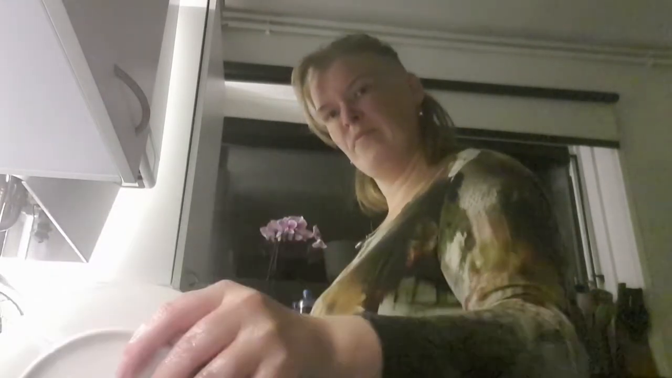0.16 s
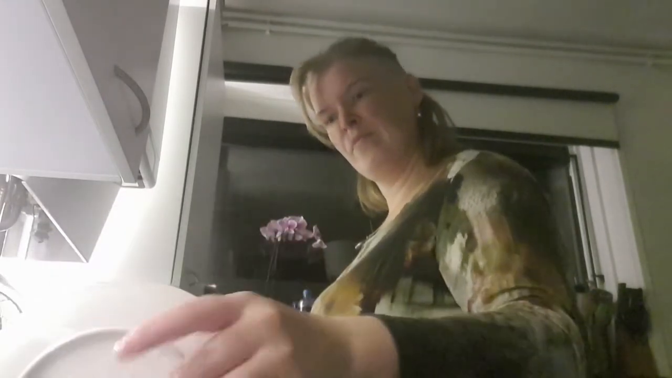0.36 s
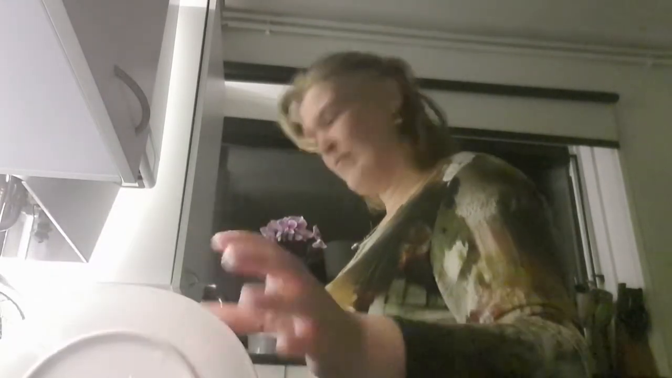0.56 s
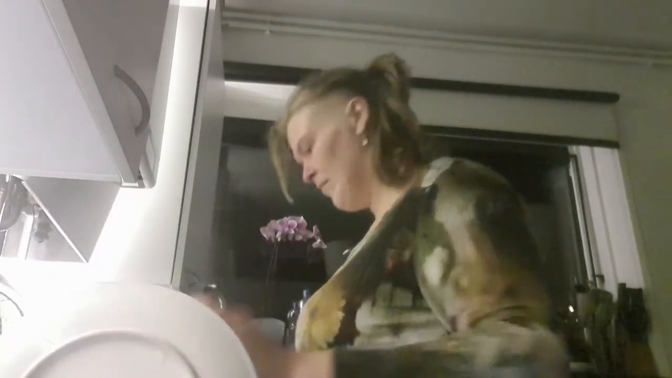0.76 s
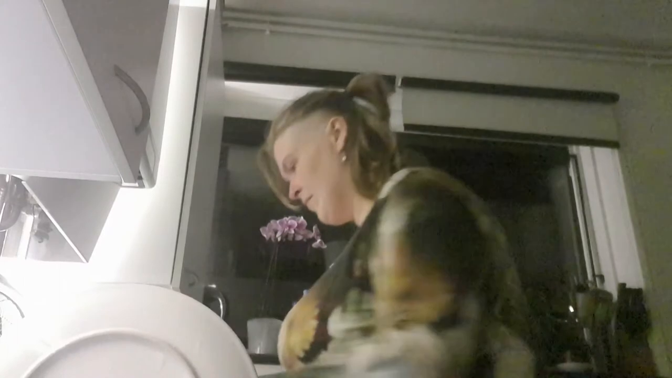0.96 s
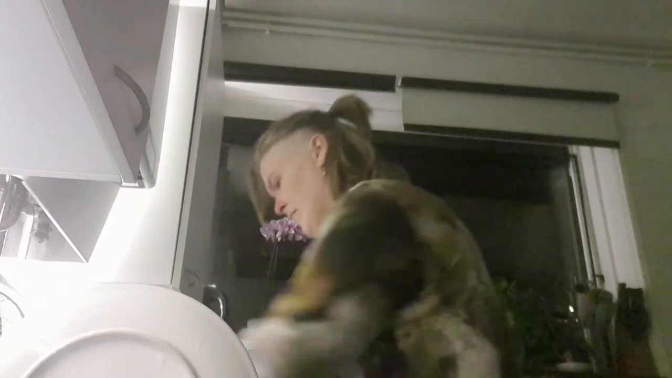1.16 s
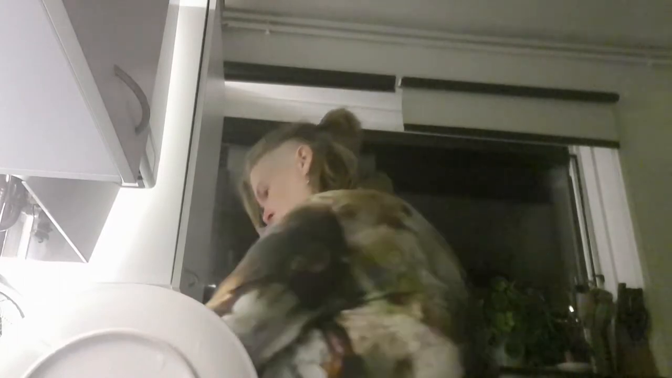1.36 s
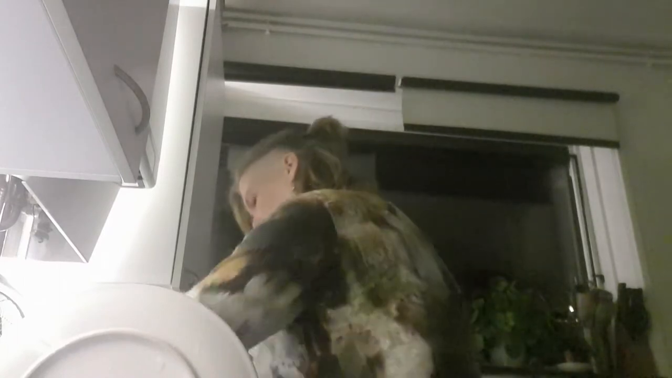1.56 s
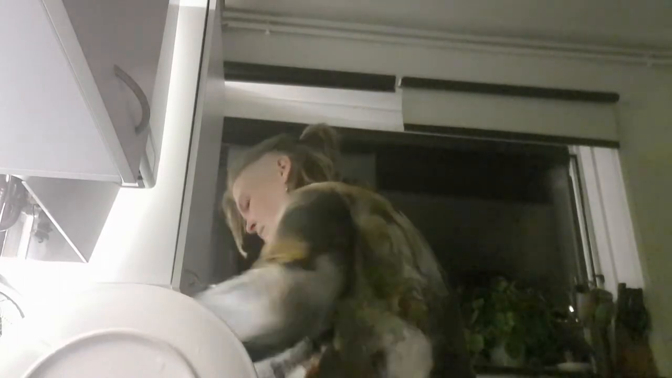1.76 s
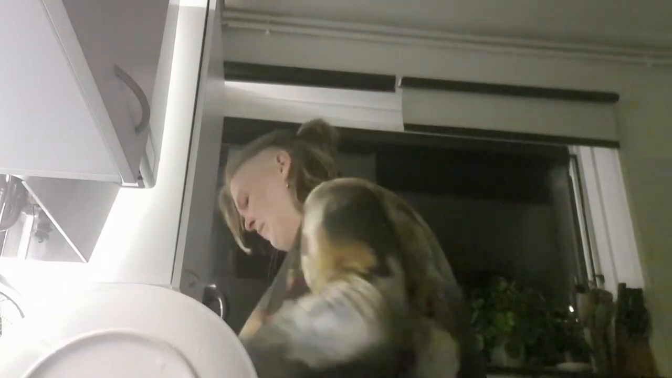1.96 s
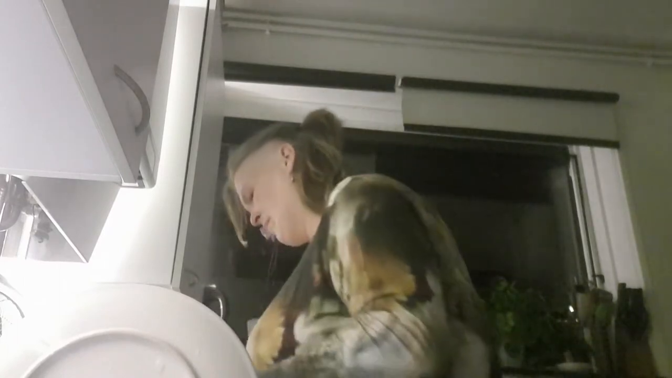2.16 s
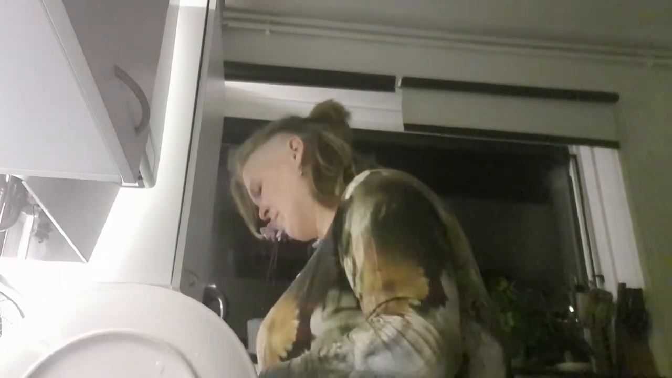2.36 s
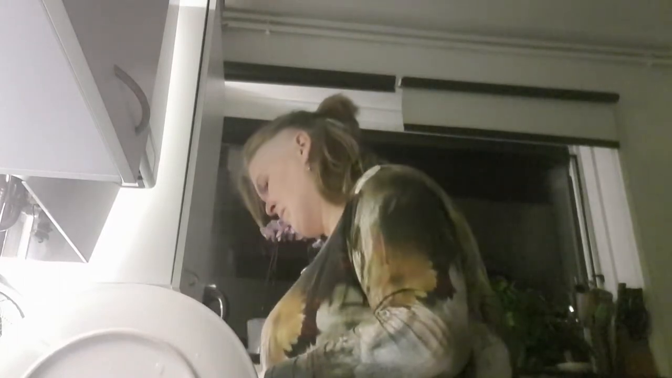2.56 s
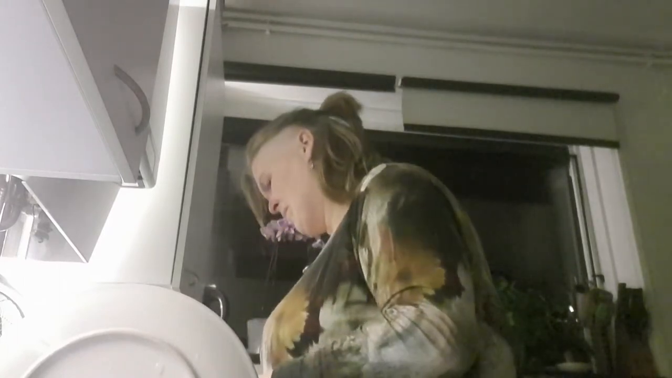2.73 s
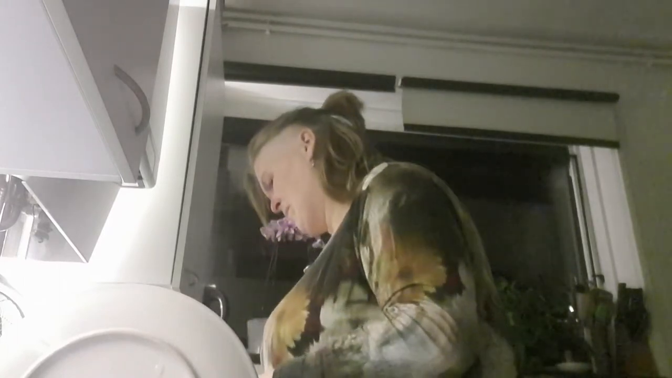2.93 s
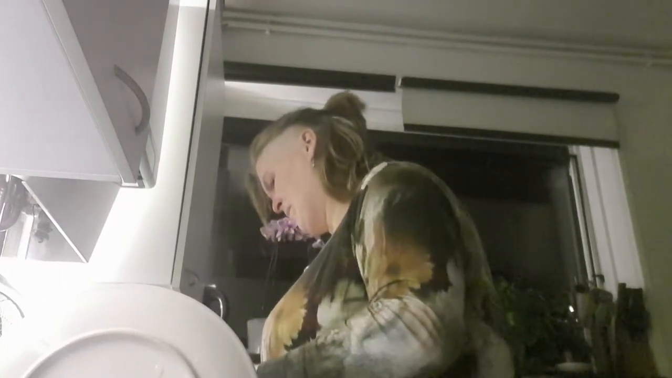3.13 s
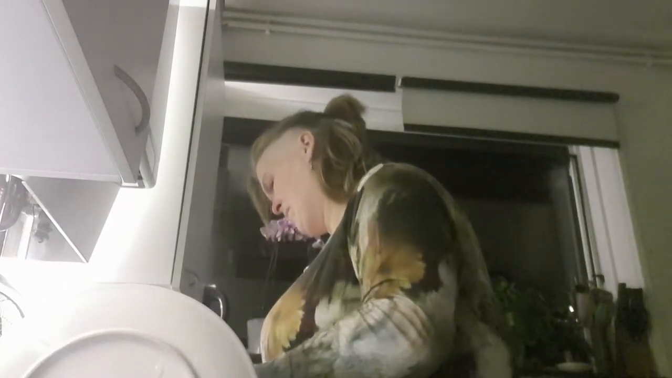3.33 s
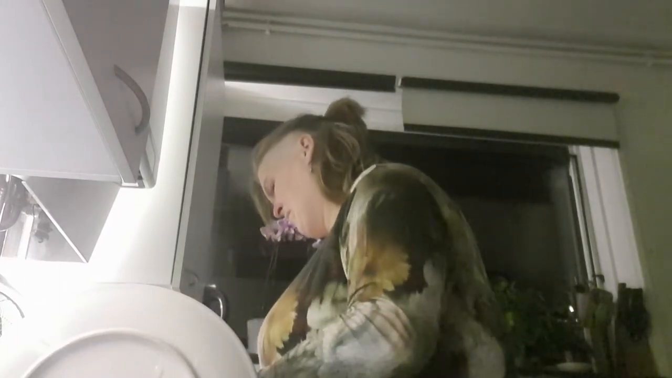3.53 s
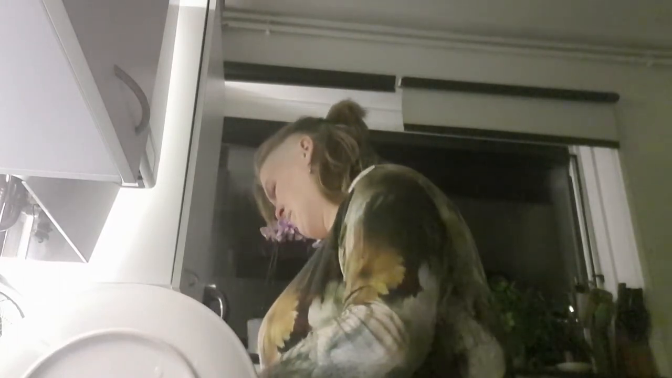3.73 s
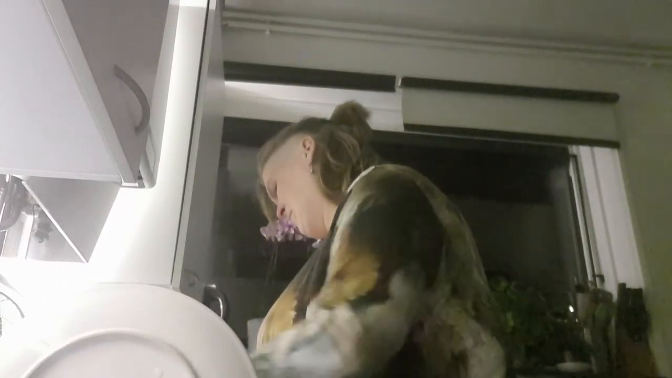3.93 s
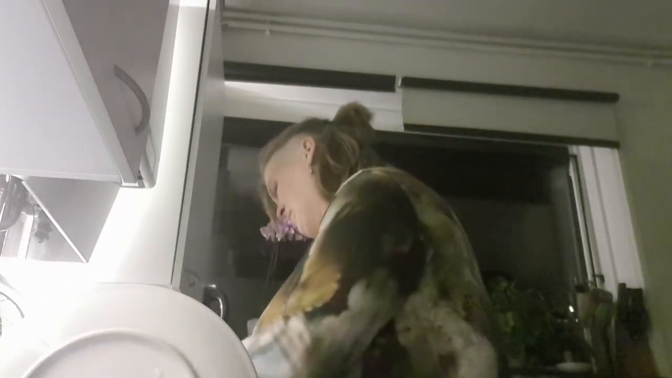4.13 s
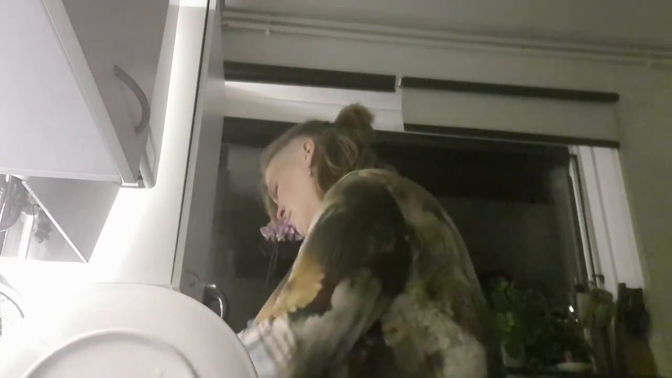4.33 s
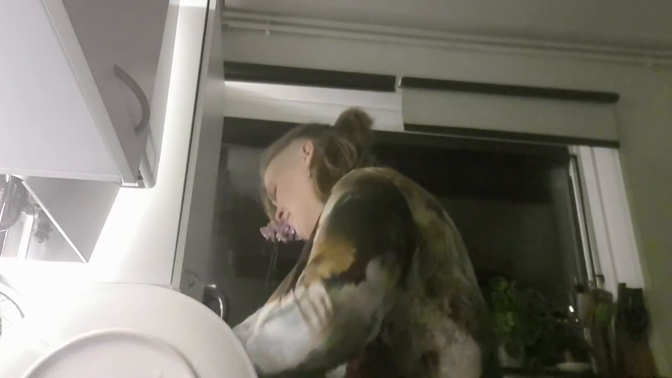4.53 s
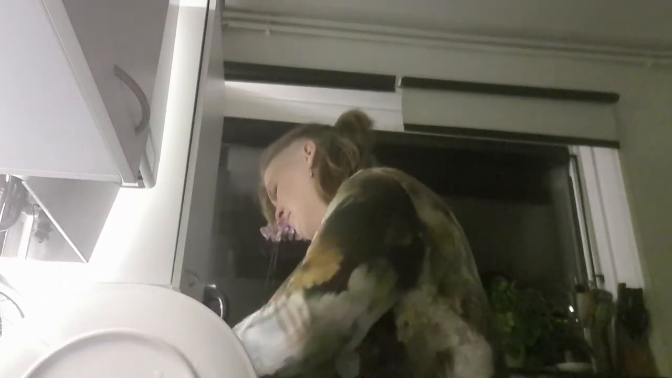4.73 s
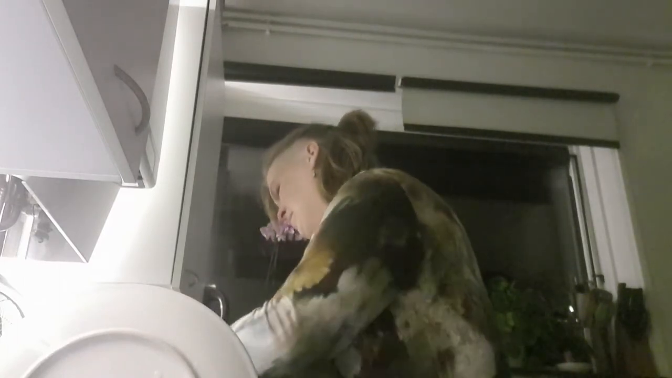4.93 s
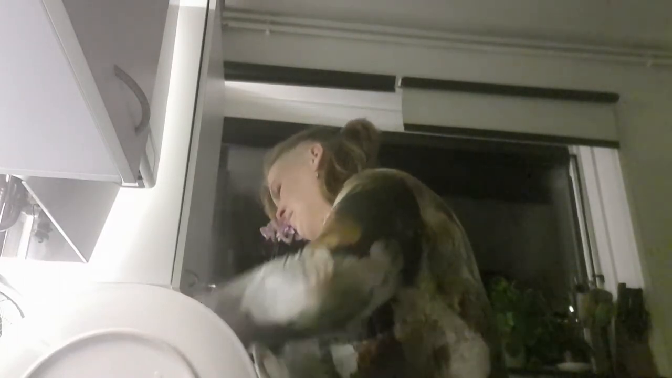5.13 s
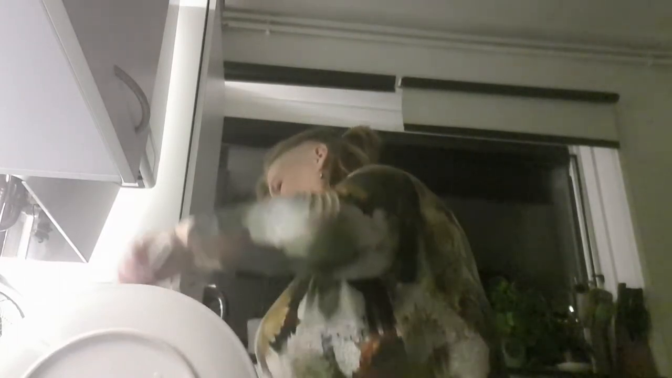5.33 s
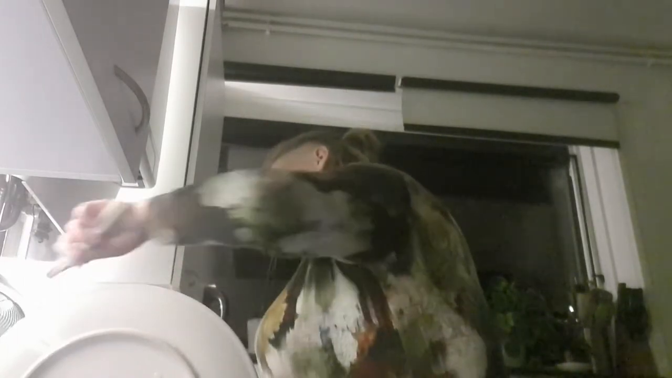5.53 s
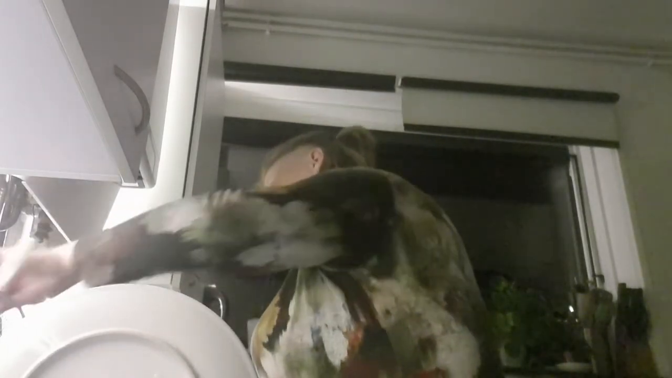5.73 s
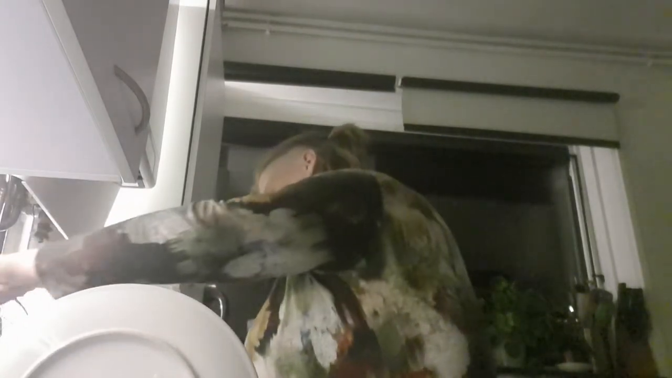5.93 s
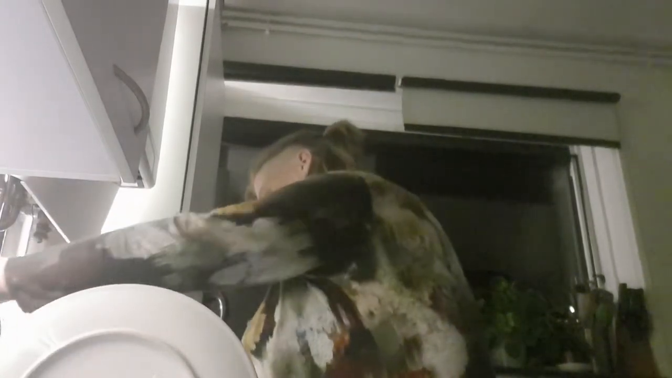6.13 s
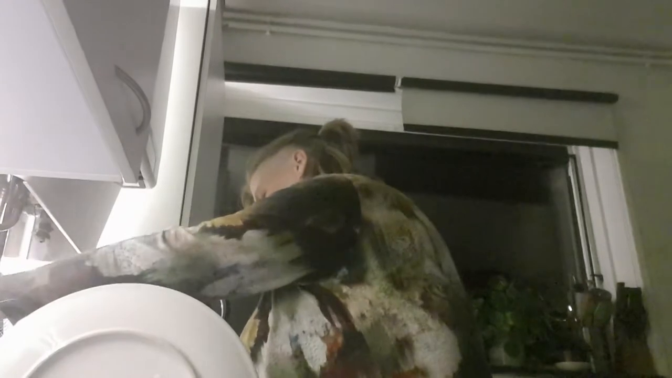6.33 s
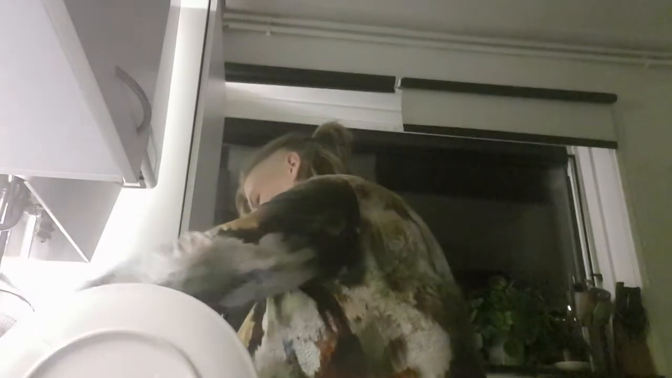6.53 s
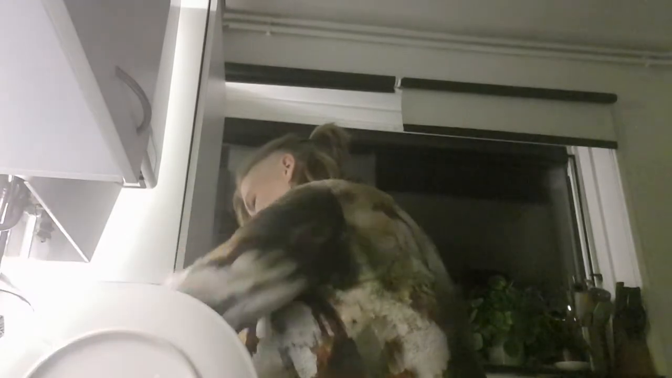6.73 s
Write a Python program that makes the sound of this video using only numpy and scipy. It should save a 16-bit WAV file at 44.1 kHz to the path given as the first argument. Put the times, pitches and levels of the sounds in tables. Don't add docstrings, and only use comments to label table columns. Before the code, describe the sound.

A wet plate clacks into a drying rack close by, then china and cutlery knock and slosh in a steel sink before quiet returns.

```python
import sys
import numpy as np
from scipy import signal
from scipy.fft import rfft, irfft
from scipy.io import wavfile

SR = 44100
rng = np.random.default_rng(int(sys.argv[2]) if len(sys.argv) > 2 else 0)


def log_audio(samples):
    frames = np.atleast_2d(samples).T
    limited = np.clip(frames, -1, 1)
    pcm = np.round(limited * 32767).astype(np.int16)
    wavfile.write(sys.argv[1], SR, pcm)


def magnitude_from_level(level_db):
    exponent = np.asarray(level_db, float) / 20
    return 10 ** exponent


N = 303849
LAG = 10

# (f/Hz, level/dB, t60/s)
BASIN_FLOOR = [(279, -11.5, 0.15), (300.3, 2, 0.065), (337, 0.5, 0.056), (380, -0.5, 0.11),
               (408, 7.5, 0.038), (439, 4, 0.025), (534.5, -1.5, 0.18)]
# (f/Hz, level/dB, t60/s)
BASIN_WALLS = [(608, 0, 0.085), (678, 3.5, 0.064), (735, -3.5, 0.077), (812, -21, 0.18), (895, -10.5, 0.08),
               (922, -4, 0.06), (1080, -23, 0.034), (1290, 3.5, 0.0084)]


def evened(x):
    return x / np.sqrt(np.mean(x ** 2) + 1e-20)


def read(points, hz):
    f, value = np.transpose(points)
    return np.interp(np.log(hz + 1), np.log(f + 1), value)


def curve(rows, order):
    rows = np.array(rows)
    return np.interp(np.arange(N) / SR, rows[:, 0], rows[:, order])


def add(mix, s, peak_db, sound):
    part = mix[round(s * SR):][:len(sound)]
    scaled = magnitude_from_level(peak_db) * sound / abs(sound).max()
    part += scaled[:len(part)]


def colour(x, points):
    size = x.shape[-1]
    gain = magnitude_from_level(read(points, np.fft.rfftfreq(size, 1 / SR)))
    return irfft(rfft(x) * gain, size)


def band(x, low_hz, high_hz):
    return signal.sosfilt(signal.butter(2, [low_hz, high_hz], "band", fs=SR, output="sos"), x)


def burst(t60, size=4096):
    return rng.standard_normal(size) * magnitude_from_level(-60 * np.arange(size) / SR / max(t60, 0.002))


def ring(modes, spread=0., uneven_db=0., size=12000):
    hz, db, t60 = np.transpose(modes)[:, :, None]
    detune, luck = rng.standard_normal((2, len(modes), 1))
    t = np.arange(size) / SR
    decay = magnitude_from_level(db + uneven_db * luck - 60 * t / t60)
    return (decay * np.sin(2 * np.pi * hz * (1 + spread * detune) * t)).sum(0)


def pair(a, b, c):
    # (f/Hz, share of power in common)
    likeness = [(100, 0.71), (400, 1), (900, 0.19), (2000, 0.12), (8000, 0.0057)]
    size = a.shape[-1]
    same = np.clip(read(likeness, np.fft.rfftfreq(size, 1 / SR)), 0, 1)
    shared = rfft(np.array([np.roll(a, LAG), a]))
    own = rfft(np.array([b, c]))
    return irfft(np.sqrt(same) * shared + np.sqrt(1 - same) * own, size)


def air():
    # (f/Hz, level/dB)
    tone = [(20, -21), (66, -2.5), (135, -12.5), (687, -7), (900, -16), (2530, -14), (12900, -11.5),
            (16500, -14.5)]
    # (f/Hz, level/dB)
    hollow = [(1900, 2.5), (2450, -7.5), (3000, 0.5), (5500, -7), (7000, -4)]
    noise = pair(*rng.standard_normal((3, N)))
    return magnitude_from_level(-53) * colour(evened(colour(noise, tone)), hollow)


def kitchen(x):
    # (f/Hz, t60/s)
    reverb = [(100, 0.16), (400, 0.28), (1500, 0.29), (5000, 0.34), (12000, 0.21)]
    turn = np.arange(N) / SR * 3.1
    out, size = np.zeros((2, N)), 21000
    for k in range(5):
        taps = np.zeros((3, size))
        at = np.arange(32, size - 8, 8) + rng.integers(0, 8, (3, (size - 33) // 8))
        np.put_along_axis(taps, at, rng.choice([-1., 1.], at.shape), 1)
        taps *= 1 + 0.4 * np.exp(-np.arange(size) / SR / 0.006)
        hz, t, z = signal.stft(pair(*taps), SR, nperseg=128)
        decay = magnitude_from_level(-60 * t / read(reverb, hz)[:, None])
        tail = signal.istft(z * decay, SR, nperseg=128)[1]
        tail /= np.linalg.norm(tail[0])
        window = np.sqrt(2 / 5) * np.cos(np.pi * (turn * (1 + k % 2) + k / 5))
        out += signal.oaconvolve((x * window)[None], tail, axes=1)[:, :N]
    return out


def shake():
    # (f/Hz, level/dB, t60/s)
    counter = [(55, 0, 0.3), (123.2, -5.5, 0.3), (119, -8.5, 0.048), (209, -9.5, 0.061)]
    # (t/s, lowest mode level/dB, upper modes level/dB, length/s)
    shoves = [(0.07, -28, -32, 0.1), (0.188, -29.5, -55, 0.08), (0.484, -41, -67, 0.15),
              (1.097, -48.5, -77, 0.23), (1.373, -57, -47, 0.17), (1.762, -44.5, -49.5, 0.046),
              (2.493, -40, -40.5, 0.039), (2.683, -46, -44, 0.16), (2.93, -51, -46.5, 0.34),
              (3.9, -48, -38, 0.041), (4.075, -49, -68, 0.17), (4.253, -51, -39.5, 0.097),
              (5.767, -60, -29, 0.063)]
    tremble_db = (-56.5, -57.5)
    rest_s, rest_db = 5.98, -5.5
    rise_share, drop_db = 0.69, 11
    modes = [evened(signal.oaconvolve(rng.standard_normal(N), ring(m, size=SR))[:N])
             for m in (counter[:1], counter[1:])]
    t = np.arange(N) / SR
    power = magnitude_from_level(np.add.outer(tremble_db, rest_db * np.clip((t - rest_s) / 0.092, 0, 1))) ** 2
    for s, low_db, upper_db, length in shoves:
        away = np.maximum(t - s, (s - t) / rise_share) / length
        power += magnitude_from_level(np.subtract.outer([low_db, upper_db], drop_db * away)) ** 2
    return (np.sqrt(power) * modes).sum(0)


def drips():
    # (t/s, peak level/dB, bubble f/Hz, spray t60/s)
    drops = [(0.2904, -55.5, 5800, 0.089), (0.5158, -47.5, 8200, 0.049), (0.651, -49.5, 6100, 0.029),
             (0.749, -51, 12900, 0.043), (0.851, -50, 12500, 0.041), (0.895, -46.5, 12200, 0.026),
             (1.2307, -50, 11300, 0.05), (3.2504, -55, 1960, 0.083), (3.549, -41.5, 7300, .015),
             (4.7039, -43, 3430, 0.014), (4.859, -48.5, 11500, 0.065), (5.3544, -52, 15300, 0.05),
             (5.5294, -55, 4670, 0.046), (5.575, -50, 2960, 0.03)]
    out, t = np.zeros(N), np.arange(3000) / SR
    for s, db, hz, t60 in drops:
        bubble = np.sin(2 * np.pi * hz * t * (1 + 6 * t))
        bubble *= magnitude_from_level(-60 * t * hz / 15)
        add(out, s, db + 9.5, signal.fftconvolve(bubble, burst(t60, size=3000)))
    return out


def water():
    # (t/s, splashing level/dB, pressure on the basin level/dB)
    settle = [
        (0.0, -41.5, -70),
        (0.06, -45, -44),
        (0.17, -52, -43),
        (0.27, -71, -60.5),
    ]
    # (t/s, splashing level/dB, pressure on the basin level/dB)
    hands = [(1.15, -100, -59.5), (1.38, -45, -54), (1.54, -38.5, -44), (1.61, -48.5, -50),
             (1.94, -59, -56), (2.49, -50.5, -54), (2.7, -54, -46), (3.1, -51, -58), (3.5, -56, -62),
             (3.86, -47.5, -48), (4.07, -63.5, -56), (4.24, -56.5, -55), (4.35, -60.5, -53),
             (4.78, -54.5, -53.5), (4.93, -64.5, -58), (5.4, -54.5, -60), (5.85, -59, -59.5),
             (6.03, -61.5, -71)]
    # (t/s, level/dB)
    drag_levels = [
        (1.3, -90),
        (1.36, -53),
        (1.4, -39),
        (1.52, -41.5),
        (1.6, -58),
        (1.63, -76),
        (1.7, -95),
    ]
    # (f/Hz, level/dB)
    fizz_colour = [(1470, -25), (2500, -0.5), (3540, -0.5), (6500, 0), (14900, -3), (16100, -26),
                   (16500, -43.5)]
    # (f/Hz, level/dB)
    slosh_colour = [(470, -15), (800, 8), (987, -8), (1410, 11.5), (1750, 13), (4500, 0.5), (5850, -92),
                    (9900, -120)]
    size_db = np.minimum(rng.exponential(1, (3, N // 64 + 1)), 3.5).repeat(64, 1)[:, :N]
    drops = rng.standard_normal((3, N)) * magnitude_from_level(2.2 * size_db)
    splash_db, press_db = curve(settle + hands, order=1), curve(settle + hands, order=2)
    fizz = magnitude_from_level(splash_db) * evened(colour(drops[0], fizz_colour))
    slosh_db = -56 + 1.34 * (splash_db + 50)
    slosh = magnitude_from_level(slosh_db) * evened(colour(drops[1], slosh_colour))
    hum = magnitude_from_level(press_db) * evened(signal.oaconvolve(drops[2], ring(BASIN_FLOOR + BASIN_WALLS))[:N])
    scrape = evened(signal.oaconvolve(drops[1], ring(BASIN_WALLS[1:5]))[:N])
    return magnitude_from_level(-1.5) * (fizz + slosh + hum) + magnitude_from_level(curve(drag_levels, order=1)) * scrape


def dishes():
    # (t/s, peak level/dB)
    plate_hits = [
        (.001, -29),
        (.0445, -27),
        (.068, -16.5),
        (.096, -27),
        (.136, -27),
    ]
    bowl_hits = [
        (1.626, -28),
        (1.883, -24.5),
        (3.380, -20),
        (3.735, -40),
    ]
    crash_hits = [
        (5.740, -18),
        (5.760, -11),
    ]
    rack_hits = [
        (5.687, -21.5),
    ]
    cup_hits = [
        (6.3445, -28.5),
    ]
    plop_hits = [
        (5.226, -33),
    ]
    frame_hits = [
        (.003, -33),
        (.046, -23.5),
        (.074, -34),
        (.097, -32),
        (.135, -32),
        (3.062, -37),
        (5.74, -39),
        (5.761, -33),
    ]
    # (f/Hz, level/dB, t60/s)
    plate = [(2120, 0, .09), (3080, -8, .08), (3380, -1, .07), (3520, -3, .06), (4290, -4, .09),
             (5400, -5, .07)]
    bowl = [(738, -4, .22), (921, -4, .1), (1240, -3, .09), (1365, -4, .28), (1490, -10, .1),
            (1775, 1, .21), (2150, -7, .17), (2640, -5, .12), (2770, -10, .12), (3650, -5, .11),
            (3830, -12, .1), (4280, -9, .13), (4720, -11, .1), (5600, -12, .08)]
    crash = [(860, 6, 0.094), (1470, -1, .06), (2510, -2, 0.07), (3100, -3, 0.044), (4420, -2, .025),
             (5450, 7.5, 0.018), (7500, -16, .025)]
    rack = [(1430, -4, .1), (2800, -7, .05), (3650, 0, .09), (4400, -2, .06), (4650, -4, .05),
            (5150, -2, .07)]
    cup = [(960, -2, 0.05), (700, -2, 0.14), (1600, -14, 0.12), (1770, 4, 0.08), (2100, 9, 0.062),
           (2260, -3, 0.059), (2350, -13, 0.09), (2510, 4, 0.078), (2850, 11, 0.07), (3035, 12, 0.041),
           (3600, 6, .06), (3830, 15, 0.053), (5100, -8, .07), (5800, -10, .05)]
    plop = [(1750, -14, .012), (1850, -14, .07), (2130, 0, .04), (2300, -6, .03)]
    frame = [(161, -18, 0.081), (196.5, 3, 0.12), (217, -15, 0.11)]
    out = np.zeros(N)
    # strokes, modes, chatter against the stroke, chatter t60 in s
    pieces = ((plate_hits, plate, 0.09, 0.05), (bowl_hits, bowl, 0.018, 0.07),
              (crash_hits, crash, 0.08, 0.08), (rack_hits, rack, 0.035, 0.07),
              (cup_hits, cup, 0.07, 0.28), (plop_hits, plop, 0.2, 0.17), (frame_hits, frame, 0.05, 0.05))
    for hits, modes, chatter, t60 in pieces:
        for s, db in hits:
            bounce = chatter * burst(t60, size=8192)
            bounce[0] = 1
            add(out, s, db, signal.fftconvolve(bounce, ring(modes, spread=0.002)))
    return out


def knocks():
    # (t/s, floor peak level/dB, walls level/dB, floor f/Hz, walls f/Hz)
    rack_knocks = [(0.009, -50, -65, 229, 587), (0.046, -52, -41, 221, 675),
                   (0.074, -26.5, -28.5, 334, 640), (0.099, -35, -61, 427, 560),
                   (0.137, -33, -41.5, 221, 670), (0.234, -44, -44.5, 345, 840),
                   (0.498, -55, -49.5, 258, 1030), (5.686, -37, -41.5, 283, 600),
                   (5.74, -18, -24.5, 310, 790), (5.761, -22, -17, 483, 613), (5.785, -26.5, -33, 510, 590),
                   (5.772, -36, -24.5, 480, 590), (5.819, -35, -38, 525, 603), (5.91, -30, -32.5, 328, 843),
                   (6.178, -41.5, -53, 262, 602), (6.346, -45, -47, 380, 620), (6.879, -35, -44, 376, 650)]
    # (t/s, floor peak level/dB, walls level/dB, walls f/Hz)
    scrub_knocks = [(1.331, -39.5, -45, 735), (1.384, -42, -58, 766), (1.472, -35, -43, 735),
                    (1.626, -23, -35, 600), (1.709, -41, -38.5, 666), (1.757, -26.5, -34.5, 1290),
                    (1.798, -35.5, -41.5, 654), (1.88, -35, -34.5, 855), (2.046, -62, -55.5, 735),
                    (2.24, -44, -40, 794), (2.441, -36.5, -34.5, 1250), (2.52, -42, -55, 615),
                    (2.692, -35.5, -55, 616), (2.997, -52, -50, 680), (1.645, -41, -47, 630),
                    (2.554, -33, -40.5, 608), (2.597, -33, -39, 603), (2.639, -38, -46, 630),
                    (2.67, -32.5, -42, 625), (2.8, -31, -37.5, 590), (2.845, -29.5, -37.5, 645),
                    (2.901, -25.5, -42, 674), (2.961, -26.5, -38.5, 607), (3.042, -29, -30, 775),
                    (3.079, -34.5, -63, 603), (3.124, -38.5, -38, 680)]
    # (t/s, floor peak level/dB, walls level/dB, floor f/Hz, walls f/Hz)
    rinse_knocks = [(3.383, -32, -24, 414, 765), (3.42, -41, -48, 420, 680), (3.47, -50, -42.5, 420, 700),
                    (3.93, -53, -60, 348, 624), (3.56, -41.5, -36.5, 480, 815), (3.7, -62, -46.5, 288, 910),
                    (3.834, -47, -41, 533, 589), (3.865, -45, -40.5, 452, 765),
                    (3.909, -30.5, -53, 443, 584), (4.025, -29, -33.5, 370, 686),
                    (4.163, -28.5, -34, 418, 780), (4.226, -17, -31, 380, 735), (4.282, -18, -26, 400, 714),
                    (4.335, -47, -40, 400, 805), (4.379, -32, -59, 402, 622), (4.559, -28, -35.5, 450, 780),
                    (4.626, -37, -43.5, 350, 552), (4.655, -37, -48, 353, 700), (4.731, -47, -59, 330, 646),
                    (4.803, -40, -58, 380, 645), (4.872, -35.5, -45.5, 370, 674)]
    scrub_floor_hz = 390
    rows = [(*row, 0.066, 0.0031, 0.66) for row in rack_knocks]
    rows += [(*row, 0.016, 0.0048, 0.46) for row in rinse_knocks]
    rows += [(s, floor, walls, scrub_floor_hz, hz, 0.083, 0.003, 1) for s, floor, walls, hz in scrub_knocks]
    out = np.zeros(N)
    for s, floor_db, walls_db, floor_hz, walls_hz, t60, rise, share in rows:
        push = 0.04 * burst(t60)
        push[:12] += signal.windows.hann(12) / 3
        add(out, s, walls_db + 2.5, band(push, 308, 1470))
        surfaces = ((BASIN_FLOOR, floor_db + 5, floor_hz), (BASIN_WALLS, walls_db + 9, walls_hz))
        for modes, db, hz in surfaces:
            favoured = [(f, level - 25.3 * abs(np.log2(f / hz)), share * decay) for f, level, decay in modes]
            sound = signal.fftconvolve(push, ring(favoured, spread=0.015, uneven_db=1, size=8000))
            landing = np.clip(0.35 + np.arange(len(sound)) / SR / rise, 0, 1)
            add(out, s, db, landing * sound)
    return band(out, 278, 6600)


def clacks():
    # (t/s, treble peak level/dB, middle level/dB, brightness level/dB, contact t60/s)
    rack_clacks = [(0.0, -25, -38.5, -27, 0.066), (0.0774, -23, -32.5, -29, 0.045),
                   (0.0445, -16, -26, 2, 0.02), (0.069, -18, -37, 1, 0.022), (0.135, -26, -34, 7, 0.018),
                   (0.234, -50, -48.5, -15, 0.034), (5.686, -13, -40, -6, 0.035),
                   (5.74, 1, -23.5, 0, 0.023), (5.759, -2.5, -25.5, 6, 0.019), (5.896, -28, -41, 15, 0.03),
                   (5.911, -24.5, -69, -7, 0.024), (6.3446, -19.5, -69, -6.5, 0.013),
                   (6.349, -39.5, -53, -24, 0.54)]
    # (t/s, treble peak level/dB, middle level/dB, brightness level/dB, contact t60/s)
    sink_clacks = [(1.333, -24.5, -40.5, -2.5, 0.02), (1.471, -12.5, -32.5, -1.5, 0.097),
                   (1.55, -17.5, -45, -3.5, 0.063), (1.622, -10, -49, -1.5, 0.072),
                   (1.632, -16.5, -35.5, -2, 0.13), (1.705, -29, -38.5, 1, 0.085),
                   (1.757, -25.5, -37.5, 4, 0.079), (2.134, -26.5, -54, 9, 0.024),
                   (2.2413, -17.5, -41.5, 0, 0.016), (2.4264, -33, -70, 5, 0.013),
                   (2.5549, -31, -47.5, 2, 0.07), (2.675, -39, -49.5, 6, 0.038), (2.798, -34, -46, 3, 0.09),
                   (3.652, -33.5, -53.5, 9, 0.05), (3.844, -29, -45.5, 10, 0.028),
                   (4.028, -36, -47.5, -12, 0.14), (2.441, -10.5, -40.5, 6, 0.0053),
                   (2.5959, -16.5, -41, 1, 0.038), (2.8376, -10.5, -36.5, 1, 0.014),
                   (2.957, -30.5, -41.5, 2, 0.037), (3.044, -16, -38.5, -12, 0.012),
                   (3.1242, -11.5, -33.5, 3, 0.032), (3.3795, -15, -36.5, 0, 0.088),
                   (3.5598, -15.5, -41, 1.5, 0.022), (3.926, -27.5, -49.5, -2, 0.031),
                   (4.1625, -36.5, -49.5, 8, 0.038), (4.2224, -40, -49.5, 0, 0.11),
                   (4.2809, -30.5, -45, 1, 0.018), (4.3272, -34, -51, -2, 0.12),
                   (4.6418, -30, -59, 1, 0.39), (4.961, -34, -74, 5, 0.1)]
    # (t/s, treble peak level/dB, middle level/dB)
    slides = [
        (4.558, -34, -53),
        (1.384, -27, -38.5),
        (1.8826, -27, -47.5),
        (3.694, -27.5, -52),
        (3.9979, -32.5, -60),
        (4.5103, -35, -62),
        (5.166, -31, -60),
    ]
    # (f/Hz, level/dB, t60/s)
    cutlery = [(3650, 0, .03), (4600, -2, .03), (5750, -3, .03), (7650, -2, .025), (8800, -2, .025),
               (9850, 0, .025), (10500, 0, .025), (11800, -2, .02), (12400, -1, .02), (13750, -2, .02)]
    long_slides = [(*row, 1, 0.27) for row in slides]
    out = np.zeros(N)
    for s, db, middle_db, bright_db, t60 in rack_clacks + sink_clacks + long_slides:
        contact = burst(t60)
        contact[0] = 4.01
        treble, top = band(contact, 2550, 6570), band(contact, 7220, 12960)
        add(out, s, db - 4, treble + magnitude_from_level(bright_db) * top)
        add(out, s, middle_db + 14.5, band(contact, 867, 3290))
        clink = ring(cutlery, spread=0.05, uneven_db=4, size=2048)
        clink_db = -21 + 0.15 * (db + 20)
        add(out, s, db + clink_db - 7, signal.fftconvolve(burst(0.012, size=512), clink))
    return out


def scene():
    blows, song = knocks(), dishes()
    rest = clacks() + drips() + water()
    sink = magnitude_from_level(-1.5) * (blows + rest)
    far = magnitude_from_level(np.interp(np.arange(N) / SR, [0.2, 0.3], [-7, 0]))
    direct = np.array([np.roll(sink, LAG) + np.roll(song, 2), sink + song]) / np.sqrt(far)
    echoed = magnitude_from_level(3.5) * (rest + blows) + magnitude_from_level(-6) * song
    return direct + kitchen(far * echoed) + shake() + air()


def roll_off(x):
    return signal.sosfilt(signal.butter(12, 16800, fs=SR, output="sos"), x)


def record(dry):
    # (f/Hz, left minus right level/dB)
    balance = [(60, 1), (250, .2), (600, 2.3), (2500, 2.3), (8000, 2.1), (11500, 0), (13500, -4)]
    # (f/Hz, level/dB)
    response = [(22, -38), (34, -18), (45, 0), (14800, 0), (15850, 3), (16050, -32), (16700, -60),
                (17500, -90)]
    tilt = np.array(balance) * [1, 0.5]
    ports = np.array([colour(dry[0], tilt), colour(dry[1], tilt * [1, -1])])
    return roll_off(colour(ports, response))


dry = scene()
out = record(dry)
log_audio(out)
```